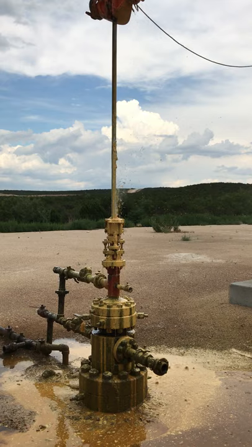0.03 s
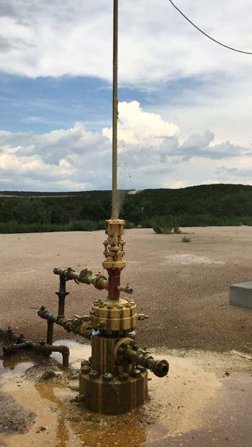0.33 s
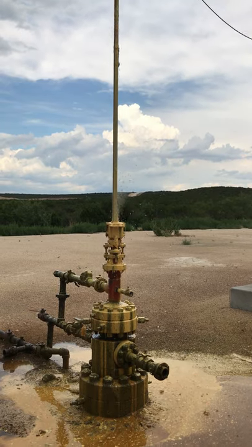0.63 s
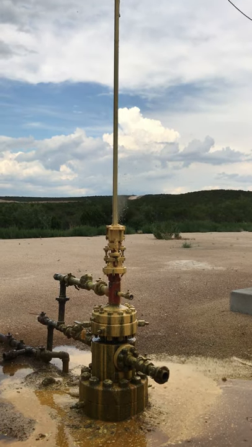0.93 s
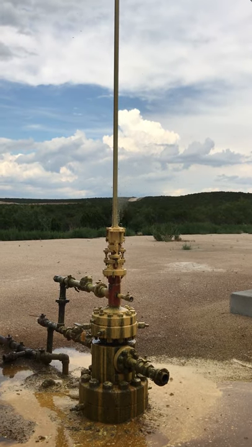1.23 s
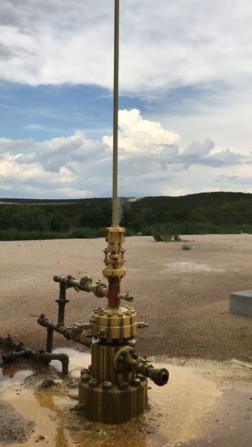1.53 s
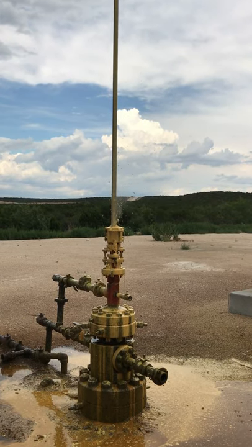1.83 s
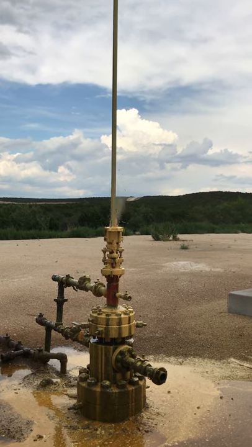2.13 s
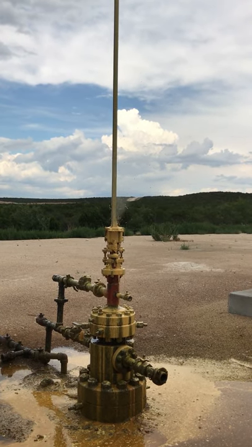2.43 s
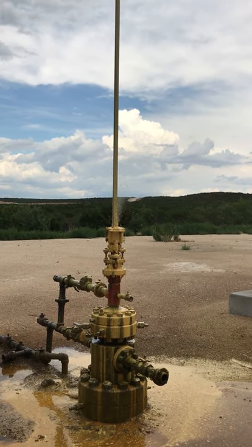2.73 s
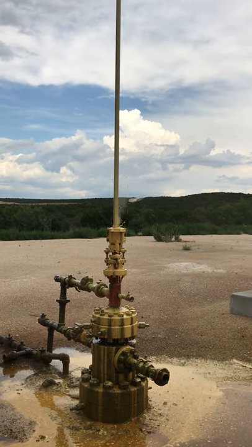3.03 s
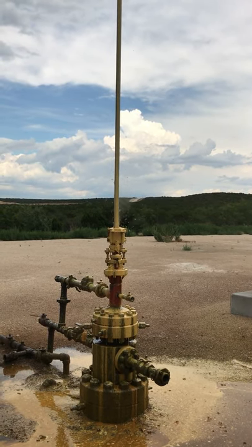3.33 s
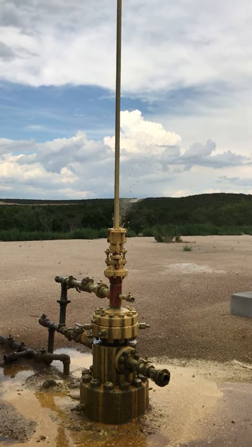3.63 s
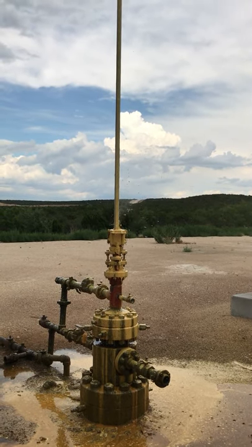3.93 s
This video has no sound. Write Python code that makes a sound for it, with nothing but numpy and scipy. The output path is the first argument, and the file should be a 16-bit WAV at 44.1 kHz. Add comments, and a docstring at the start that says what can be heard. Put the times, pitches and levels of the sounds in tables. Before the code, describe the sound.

Pressurised gas and liquid spray from a leaking wellhead with a loud, sputtering hiss.

```python
"""A jet of gas and liquid sprays from the leaking seal of a wellhead, a few steps away in the open.
It hisses through a steel gap, spits, sputters about fifteen times a second, and near the end
twice chokes and bursts free. Slugs (lumps) of liquid gurgle and glug in the hollow pipe fitting.
The hard wet ground mirrors the sound and gives it a hollow colour. An engine drones far off."""
import sys
import numpy as np
from scipy import signal
from scipy.fft import rfft, irfft, next_fast_len
from scipy.io import wavfile
from scipy.ndimage import map_coordinates

SR = 44100
rng = np.random.default_rng(int(sys.argv[2]) if len(sys.argv) > 2 else 0)


def generate_wav(sig):
    """Save sig (samples, or channels by samples) to the path in sys.argv[1] as 16-bit PCM at SR."""
    pcm = np.round(np.clip(np.atleast_2d(sig).T, -1, 1) * 32767).astype(np.int16)
    wavfile.write(sys.argv[1], SR, pcm)


N = 176400


def amp(db):
    """Turn decibels into a number to multiply by."""
    return 10 ** (np.asarray(db) / 20)


def unit(x):
    """Scale a signal to an average power of 1."""
    return x / np.sqrt(np.mean(x ** 2) + 1e-20)


def along(points, hz):
    """Read between (Hz, value) points, with the octaves evenly spaced."""
    point_hz, values = np.transpose(points)
    return np.interp(np.log(hz + 1), np.log(point_hz + 1), values)


def curves(rows):
    """Join rows that begin with a time into one line per further column, a value for every sample."""
    seconds, *columns = np.transpose(rows)
    return [np.interp(np.arange(N) / SR, seconds, column) for column in columns]


def wobble(rate):
    """A smooth curve through `rate` random values a second."""
    return map_coordinates(rng.standard_normal(N // 20), [np.arange(N) * rate / SR], mode="wrap")


def filtered(x, response):
    """Scale and delay each frequency in x as the function `response` says."""
    size = next_fast_len(N + SR // 4)
    return irfft(rfft(x, size) * response(np.fft.rfftfreq(size, 1 / SR)), size)[..., :N]


def below(x, hz, steepness=10):
    """Keep what lies below hz, with a soft edge."""
    return filtered(x, lambda f: 1 / (1 + (f / hz) ** steepness))


def coloured(x, spectrum):
    """Shape the tone of x by (Hz, dB) points, then scale it to a power of 1."""
    return unit(filtered(x, lambda hz: amp(along(spectrum, hz))))


def resonance(f, hz, width_hz):
    """How something that rings at hz answers each frequency f."""
    return 1j * f * width_hz / (hz * hz - f * f + 1j * f * width_hz)


def jet(sputter_db, level_db=-25.5, drops_db=-12, treble_from_hz=5140, top_from_hz=9300):
    """Swirling gas and droplets hiss out of the seal; the lowest band sputters most."""
    # Each row: frequency in Hz, relative level of the hiss in dB.
    colour = [(60, -28), (150, -3), (220, -6.5), (330, -2), (480, 1), (760, -8), (1000, -4.5), (1250, -4),
              (1620, 1), (1950, -2.5), (2300, -1), (3100, -3), (3850, -1), (4250, -2.5), (4900, -4.5),
              (5400, -2.5), (6200, -4.5), (7100, -3), (7700, -6), (8300, -3.5), (9600, -7.5),
              (10500, -12.5), (11400, -8.5), (13100, -8.2), (15700, -13)]
    # Narrow peaks that give the upper hiss a hollow, ringing colour.
    # Each row: pitch in Hz, width in Hz, boost in dB.
    hiss_peaks = [(3970, 150, 1), (4540, 220, 4), (5210, 93, 3.5), (5440, 100, 3), (5760, 130, 4.5),
                  (6600, 350, 0.4), (8400, 370, 3), (9760, 650, 2.5)]
    # Three bands, low to high. Each row: time in seconds, level in dB (only its rise and fall count).
    body_level = [(0.1, -25), (0.19, -26.5), (0.22, -24), (0.37, -27.5), (0.46, -26), (0.64, -28.5),
                  (0.7, -24.5), (0.73, -26.5), (0.94, -27), (1.0, -26), (1.03, -26.5), (1.42, -26),
                  (1.45, -24.5), (1.54, -27), (1.57, -25), (1.69, -27.5), (1.78, -25.5), (1.93, -27),
                  (2.23, -25.5), (2.5, -27), (2.53, -24.5), (2.62, -29), (2.68, -24.5), (2.71, -26.5),
                  (2.95, -26.0), (2.98, -24), (3.04, -27.8), (3.1, -28), (3.13, -24), (3.25, -28),
                  (3.34, -24.5), (3.44, -28), (3.5, -26.5), (3.515, -24.5), (3.59, -23.5), (3.67, -27),
                  (3.745, -24.5), (3.77, -27.5), (3.84, -30.5), (3.855, -24), (3.91, -24), (4.0, -29.5)]
    treble_level = [(0.1, -30.5), (0.16, -25.5), (0.4, -26.0), (0.43, -22.5), (0.64, -29.5), (0.7, -24),
                    (0.79, -28.5), (0.82, -26), (1.27, -27), (1.6, -24), (1.69, -27), (1.84, -24.5),
                    (2.08, -30), (2.11, -27.5), (2.2, -28.5), (2.23, -25), (2.47, -26), (2.5, -24),
                    (2.56, -28.5), (2.71, -25.2), (2.98, -25.5), (3.07, -28.5), (3.19, -23.3),
                    (3.22, -27.1), (3.34, -28), (3.37, -32), (3.41, -28.5), (3.445, -36.5), (3.5, -33),
                    (3.515, -29.5), (3.57, -24.5), (3.63, -24), (3.675, -28), (3.735, -24.5), (3.78, -28),
                    (3.84, -30.5), (3.855, -26), (3.92, -27.5), (4.0, -30)]
    top_level = [(0.1, -34.4), (0.16, -36.2), (0.34, -29.5), (0.37, -35.3), (0.4, -29), (0.55, -34),
                 (0.94, -30.5), (1.0, -36), (1.06, -29.5), (1.21, -33), (1.9, -30.5), (2.05, -34.5),
                 (2.2, -29.5), (2.53, -33.5), (2.8, -29.5), (2.98, -30.5), (3.07, -35.5), (3.16, -30.5),
                 (3.36, -36), (3.5, -34.5), (3.555, -30.7), (3.63, -31.3), (3.675, -36), (3.735, -30),
                 (3.78, -39), (3.835, -39), (3.865, -31), (3.92, -31.5), (4.0, -33)]

    def peak_boost(f):
        return amp(sum(db * abs(resonance(f, hz, width)) ** 2 for hz, width, db in hiss_peaks))

    spray = rng.standard_normal(N) + amp(drops_db) * droplets()
    hiss = shifting_gap(coloured(spray, colour))
    hiss = unit(filtered(hiss, peak_boost))
    flutter_db = 0.5 * wobble(rate=55)  # shared by all three bands
    high_shake_db = 0.16 * sputter_db + 0.64 * wobble(rate=64)
    body_shake_db = sputter_db + 0.58 * wobble(rate=60)
    body, under_top = below(hiss, treble_from_hz), below(hiss, top_from_hz)
    bands = [(body, body_level, body_shake_db),
             (under_top - body, treble_level, high_shake_db),
             (hiss - under_top, top_level, high_shake_db)]
    out = 0
    for band, level, shake_db in bands:
        swell_db, = curves(level)
        out += band * amp(swell_db - swell_db.mean() + flutter_db + shake_db)
    return amp(level_db) * out


def droplets(per_second=1500, spread_db=3):
    """Droplets tear off in a stream of tiny snaps of uneven size."""
    size = amp(spread_db * np.minimum(rng.exponential(size=N), 3))
    snaps = rng.random(N) < per_second / SR
    return unit(snaps * size * rng.choice([-1, 1], N))


def shifting_gap(hiss, depth_db=1.23, full_from_hz=2500):
    """The gap keeps changing shape, so narrow bands of the upper hiss come and go."""
    hz, _, slices = signal.stft(hiss, SR, nperseg=512)
    blur = np.outer(np.hanning(12), np.hanning(12))  # one patch's size in frequency and time
    patches = unit(signal.fftconvolve(rng.standard_normal(slices.shape), blur, "same"))
    change_db = depth_db * np.minimum(hz / full_from_hz, 1)[:, None] * patches
    _, patchy_hiss = signal.istft(slices * amp(change_db), nperseg=512)
    return unit(patchy_hiss[:N])


def sputter(rate_hz=15, beat_at_s=1.449, scatter_cycles=0.07):
    """Liquid chokes and frees the gap in a loose rhythm; gives the swing in level, in dB."""
    # Each row: time in seconds, depth of the swing in dB (a minus flips the swing).
    depth = [(0, -2), (1.1, 1.2), (1.35, 2.3), (1.7, 0.9), (2, 0.8), (2.9, 0.2), (3.2, -0.2), (4, 0.4)]
    depth_db, = curves(depth)
    cycles = rate_hz * (np.arange(N) / SR - beat_at_s) + scatter_cycles * wobble(rate=6.2)
    return depth_db * np.cos(2 * np.pi * cycles)


def gurgle(sputter_db, sputter_scale=1.1, lumpy_db=2.5):
    """Slugs of liquid make the hollow fitting ring in short, uneven bursts."""
    # Where the fitting rings. Each row: pitch in Hz, width in Hz, relative level in dB.
    rings = [(465, 53, -0.5), (533, 82, -3.5), (651, 66, -3)]
    # Each row: time in seconds, level of the gurgle in dB.
    level = [(.08, -35), (.24, -34), (.33, -35.5), (.52, -38), (.62, -42), (.7, -37.5), (1.12, -35),
             (1.25, -37.5), (1.6, -36), (2.05, -38.5), (2.6, -38.5), (3, -38.5), (3.18, -36), (3.45, -44),
             (3.6, -34), (3.8, -40.5), (3.9, -43), (4, -43)]

    def hollow(f):  # every second ring is added upside down
        return sum((-1) ** k * amp(db) * resonance(f, hz, width)
                   for k, (hz, width, db) in enumerate(rings))

    slugs = rng.standard_normal(N) * amp(sputter_scale * sputter_db + lumpy_db * wobble(rate=90))
    return amp(curves(level)[0]) * unit(filtered(slugs, hollow))


def ground_echo(leak, long_path_s=0.003615, short_path_s=0.00333):
    """The wet ground bounces the sound back along two paths of nearly equal length."""
    # Each row: frequency in Hz, share of the sound that bounces back.
    bounce = [(100, 0.61), (900, 0.46), (3200, 0.48), (6000, 0.26), (8000, 0.3), (10000, 0.11),
              (15000, .04)]
    # Each row: time in seconds, strength of the short path as a share of the long one.
    short_share = [(0, 0.067), (1.5, 0.067), (4, 0.21)]

    def echo(delay_s):
        return filtered(leak, lambda hz: along(bounce, hz) * np.exp(-2j * np.pi * hz * delay_s))

    return echo(long_path_s) + curves(short_share)[0] * echo(short_path_s)


def engine(waver_hz=0.46, waver_db=3.0):
    """A far engine drones at its firing rate and at double that rate, over a dull rumble."""
    # Each row: time in seconds, firing rate in Hz, base level in dB.
    running = [(0, 63.8, -40.5), (.8, 62.8, -46), (1.15, 63, -55), (1.6, 65.5, -50), (2.2, 66, -53),
               (2.8, 65.5, -54), (3.4, 66, -49.5), (4, 65.5, -53)]
    # The dB added to the base level for the lower tone, then for the upper one.
    tones_db = [-8.5, -0.5]
    # Each row: frequency in Hz, relative level in dB.
    rumble_colour = [(20, -26), (35, -21), (50, -4), (62, 3), (74, -2.5), (95, 1.5), (112, 4.5), (135, 2.5),
                     (160, -15), (250, -34), (600, -60)]
    # Each row: time in seconds, level in dB.
    rumble_level = [(0, -49), (1.3, -47), (1.52, -45), (1.78, -49), (1.93, -40), (2.13, -47), (2.38, -45.5),
                    (2.6, -46.5), (3, -49), (3.35, -46.5), (4, -49)]
    firing_hz, base_db = curves(running)
    phase = 2 * np.pi * np.cumsum(firing_hz + waver_hz * wobble(rate=9.63)) / SR
    drone = 0
    for multiple, db in enumerate(tones_db, start=1):
        tone = np.sqrt(2) * np.sin(multiple * phase)
        drone += amp(base_db + db + waver_db * wobble(rate=8.34)) * tone
    rumble = coloured(rng.standard_normal(N), rumble_colour)
    return drone + amp(curves(rumble_level)[0]) * rumble


def glugs(gain_db=-9.5, rise_s=0.011, wander_hz=59.8):
    """The biggest slugs glug through the fitting, each swelling and dying at its own unsteady pitch."""
    # Each row: start in seconds, peak level in dB before gain_db is added, pitch in Hz.
    big_slugs = [(0.16, -20.5, 571), (0.232, -15.5, 535), (0.412, -24, 466), (0.55, -22, 499),
                 (0.664, -22.5, 540), (0.842, -19, 501), (0.986, -17, 463.5), (1.131, -25, 526),
                 (1.56, -26, 522), (1.707, -19, 522), (1.773, -21.5, 508), (1.87, -18, 493),
                 (2.052, -23, 480), (2.211, -19, 565), (2.315, -22, 525), (2.445, -16.5, 640),
                 (2.706, -17.5, 530), (2.966, -18.5, 531), (3.174, -23, 552), (3.365, -21, 507),
                 (3.593, -19.5, 653), (3.873, -26, 504)]
    t, out = np.arange(N) / SR, 0
    for start_s, db, hz in big_slugs:
        age = np.maximum(t - start_s, 0) / rise_s
        swell = (age * np.exp(1 - age)) ** 2
        phase = 2 * np.pi * np.cumsum(hz + wander_hz * wobble(rate=200)) / SR
        out += amp(db + gain_db) * swell * np.sin(phase)
    return out


def spits():
    """The gap narrows and rings for a moment, giving a short, half-whistling squirt."""
    # Each row: middle in seconds, fade time to either side in seconds, pitch in Hz,
    # rough width in Hz, level at the middle in dB.
    squirts = [(0.312, 0.03, 9800, 2000, -32), (1.318, 0.017, 3240, 400, -34), (1.627, .05, 4870, 800, -31),
               (1.718, 0.035, 3250, 300, -30.5), (1.812, 0.04, 9400, 700, -37),
               (3.341, 0.033, 3650, 400, -33), (3.554, 0.06, 2380, 400, -31),
               (3.656, 0.11, 2670, 400, -33.5), (3.92, 0.056, 3950, 450, -30)]
    t, out = np.arange(N) / SR, 0
    for middle_s, fade_s, hz, width_hz, db in squirts:
        ring = unit(filtered(rng.standard_normal(N), lambda f: resonance(f, hz, 2 * width_hz) ** 2))
        swell = np.exp(-2 * ((t - middle_s) / fade_s) ** 2)
        out += amp(db) * swell * ring
    return out


def scene():
    """The leak, its echo off the ground and the engine, the same in both ears."""
    sputter_db = sputter()
    leak = jet(sputter_db) + spits() + gurgle(sputter_db) + glugs()
    mix = leak + ground_echo(leak) + engine()
    return np.array([mix, mix])


def record(dry):
    """The sound cuts in after a moment of silence, and its very highest treble is removed."""
    start_s, fade_in_s, top_hz = 0.083, 0.001, 15750
    fade_in = np.clip((np.arange(N) / SR - start_s) / fade_in_s, 0, 1)
    return filtered(dry * fade_in, lambda hz: np.clip((top_hz - hz) / 100 + 0.5, 0, 1))


dry = scene()
out = record(dry)
generate_wav(out)
```